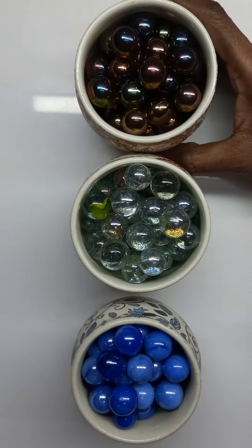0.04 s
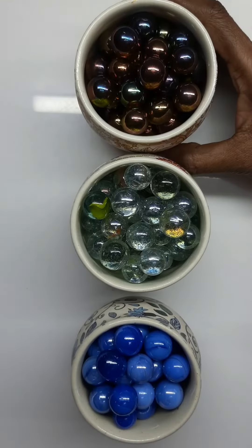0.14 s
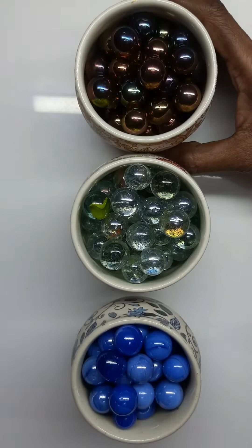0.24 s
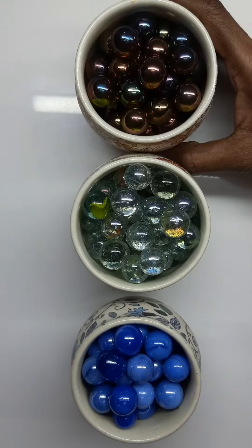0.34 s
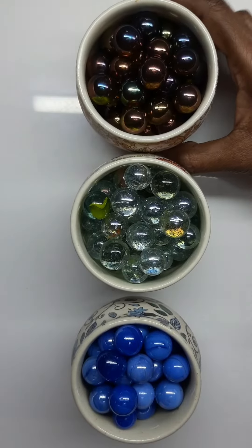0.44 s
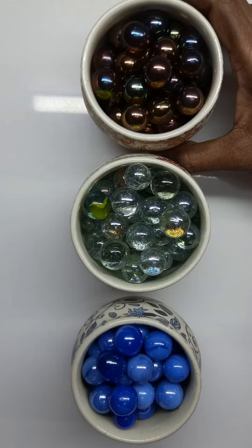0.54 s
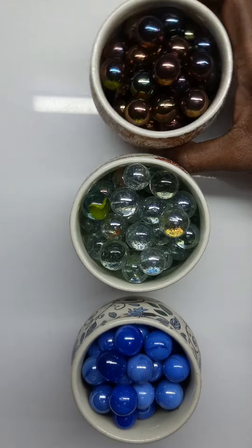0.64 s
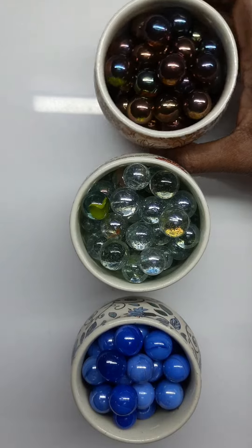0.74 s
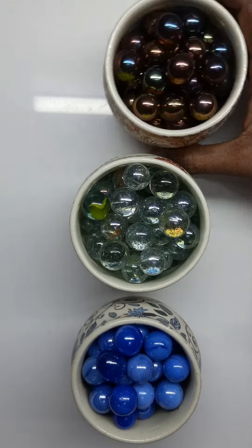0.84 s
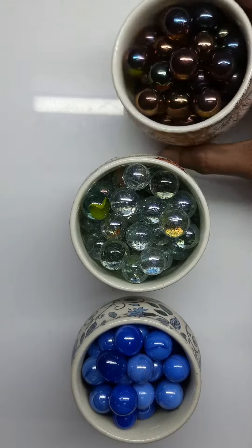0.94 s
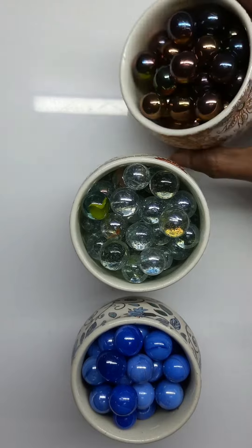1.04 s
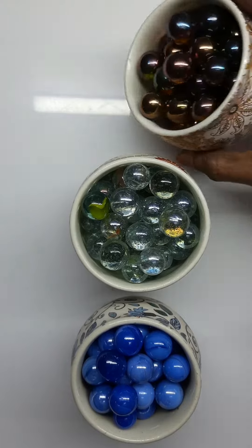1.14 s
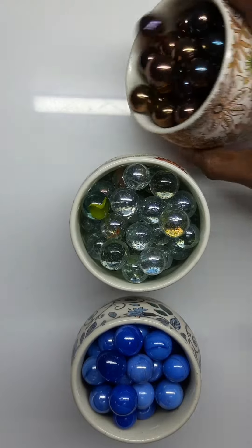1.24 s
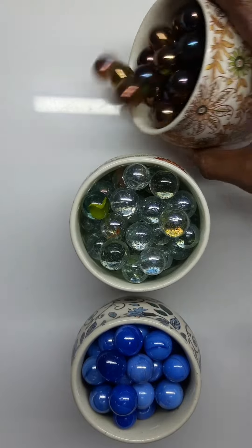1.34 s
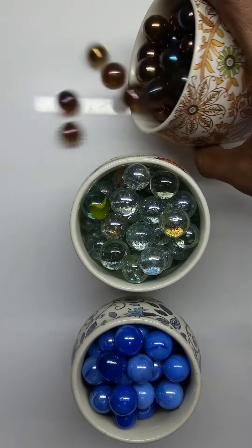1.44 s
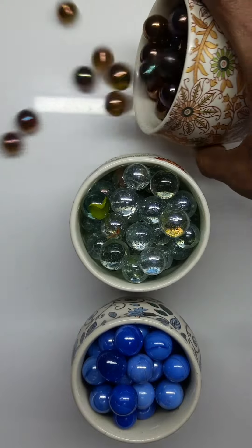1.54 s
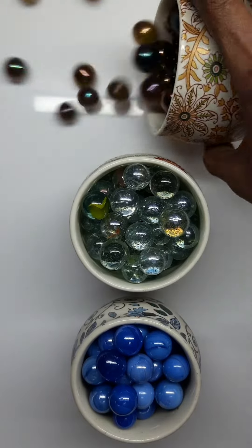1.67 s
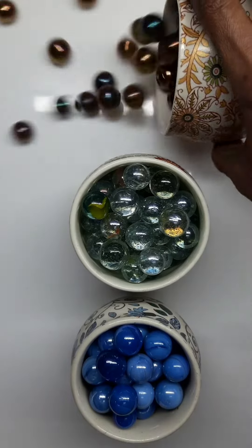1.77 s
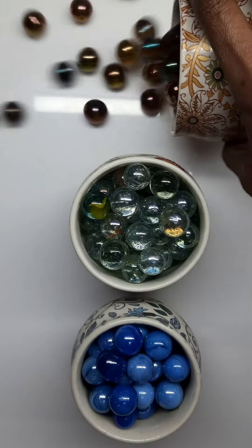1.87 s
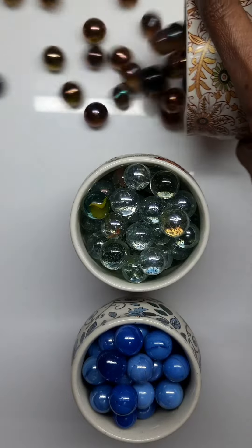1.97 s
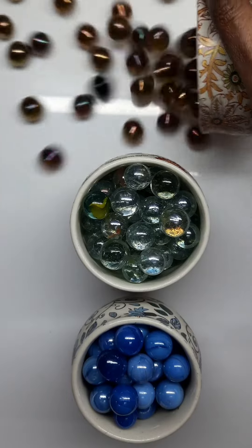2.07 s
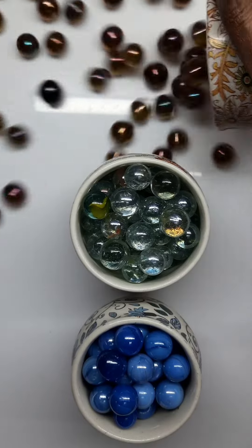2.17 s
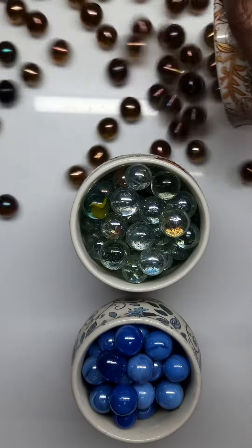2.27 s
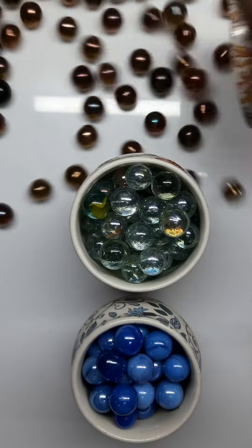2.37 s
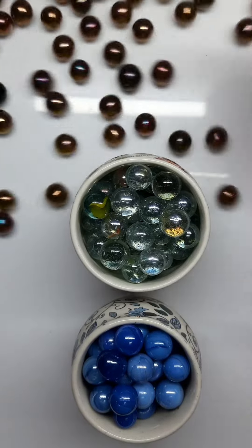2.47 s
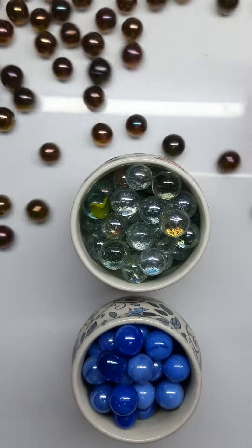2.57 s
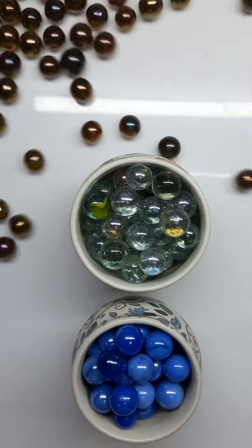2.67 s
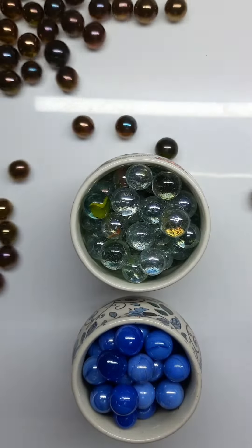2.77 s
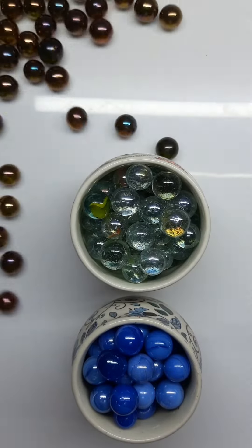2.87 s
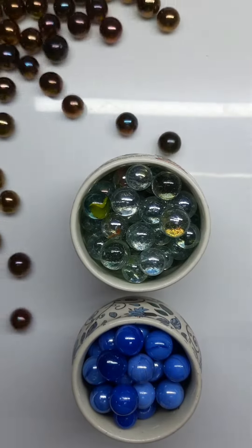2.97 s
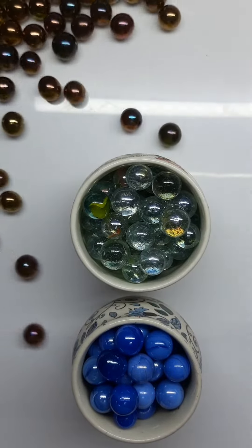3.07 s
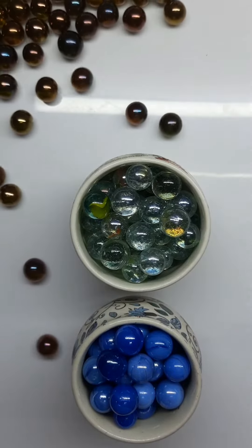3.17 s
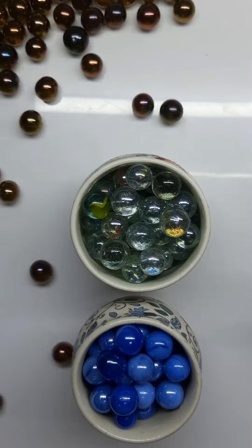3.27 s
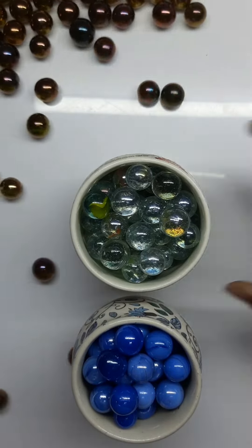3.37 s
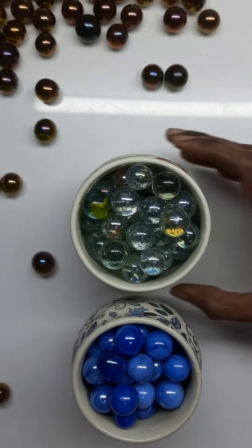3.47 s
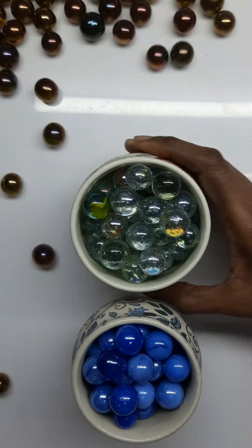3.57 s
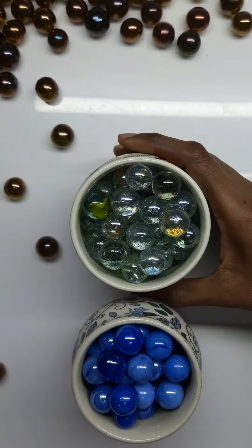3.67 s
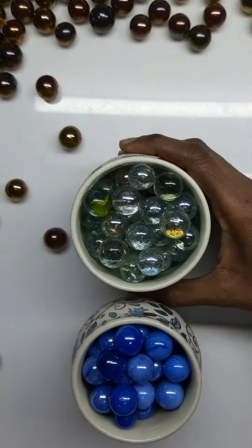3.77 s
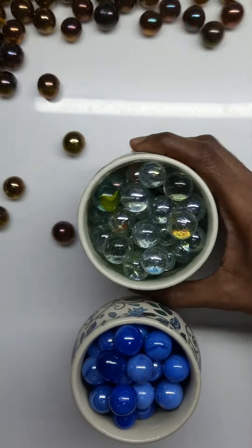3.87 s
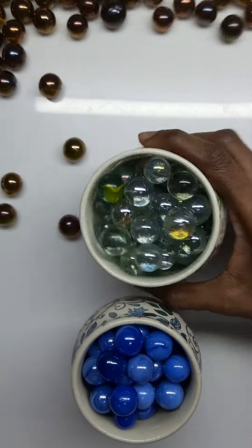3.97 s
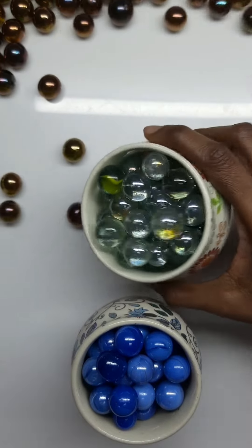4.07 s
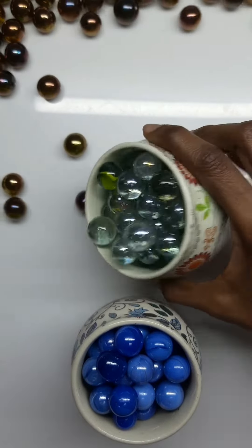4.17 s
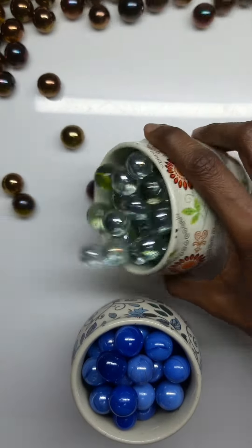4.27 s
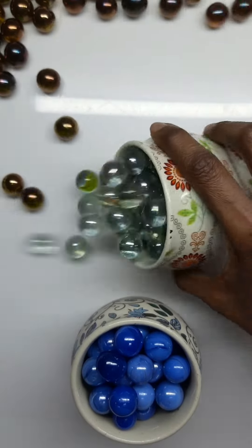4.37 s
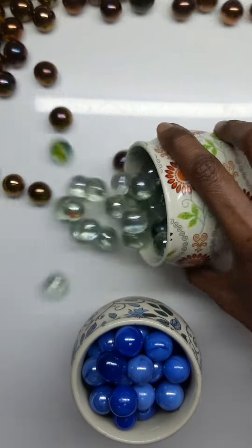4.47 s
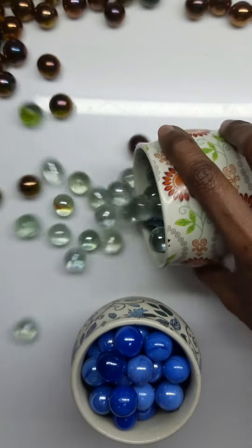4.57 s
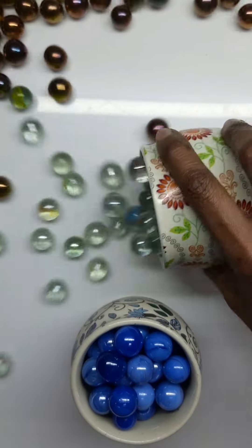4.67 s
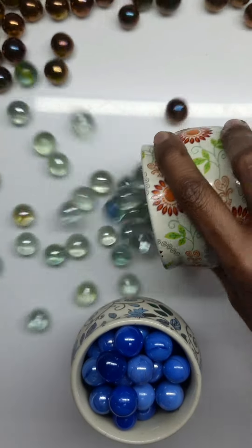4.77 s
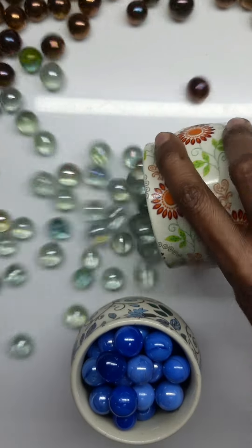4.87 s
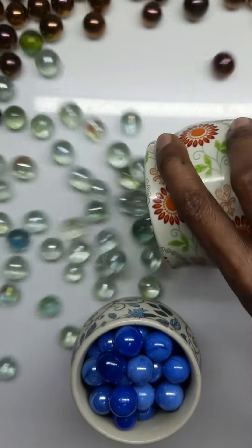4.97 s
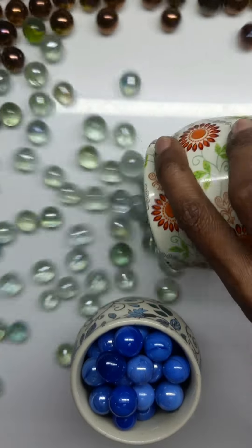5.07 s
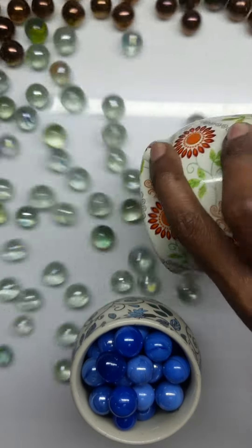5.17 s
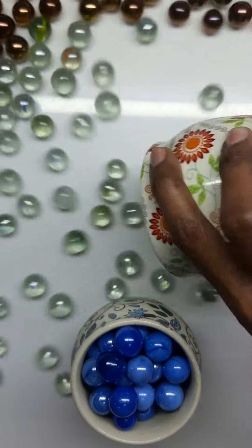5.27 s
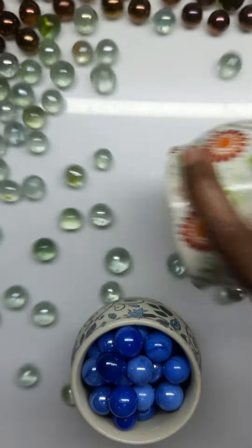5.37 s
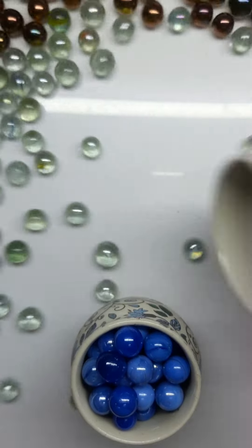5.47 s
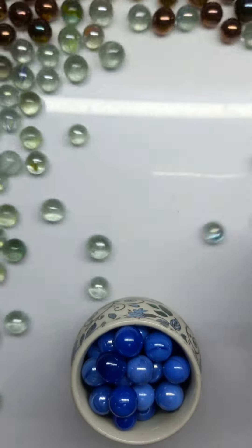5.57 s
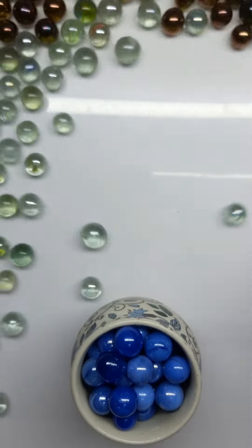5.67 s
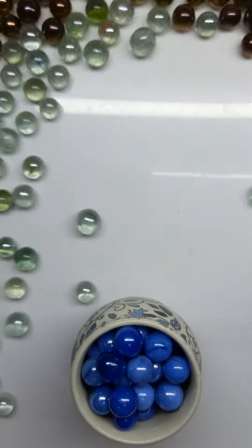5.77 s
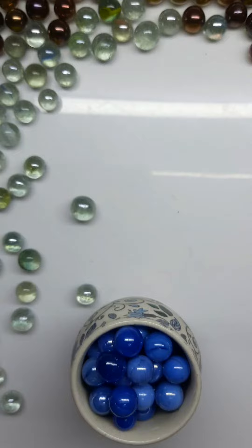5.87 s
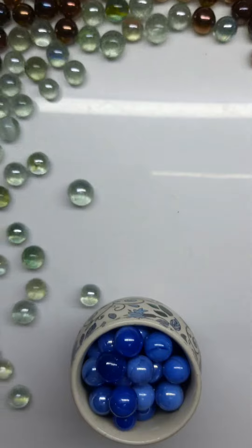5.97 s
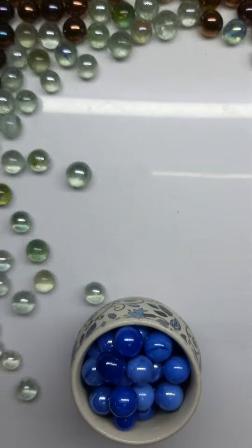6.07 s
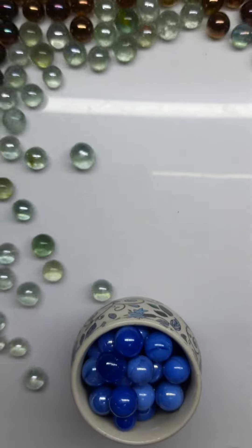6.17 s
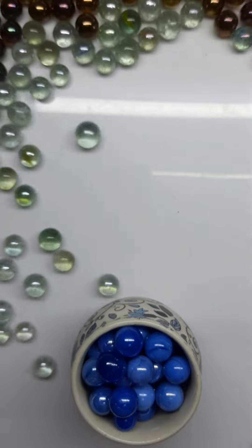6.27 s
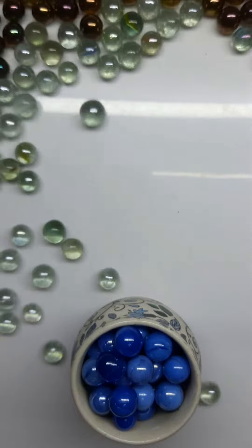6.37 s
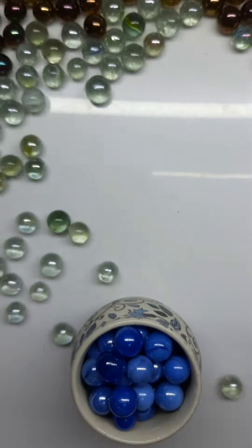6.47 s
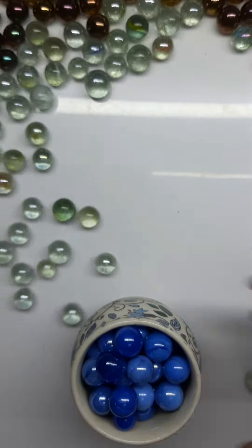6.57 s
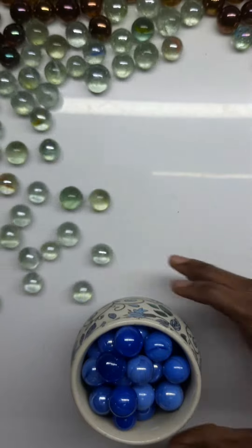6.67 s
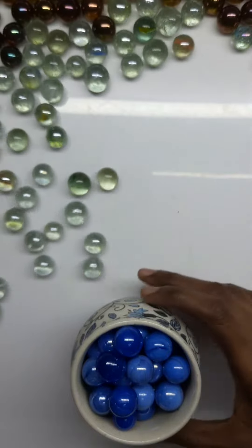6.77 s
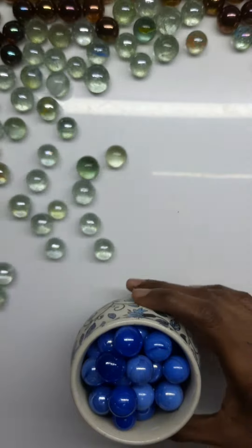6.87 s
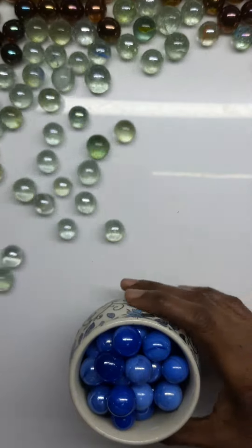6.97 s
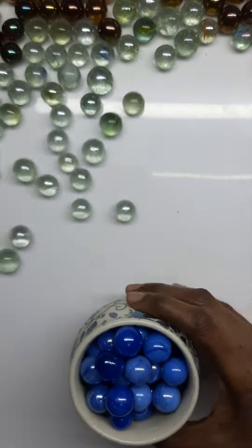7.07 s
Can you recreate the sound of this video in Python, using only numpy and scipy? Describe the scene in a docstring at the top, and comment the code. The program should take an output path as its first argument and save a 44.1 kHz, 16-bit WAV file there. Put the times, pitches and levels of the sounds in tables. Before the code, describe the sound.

Glass marbles clink out of a tipped ceramic cup, clatter and thump onto a hard board, roll and click, then a second cupful follows.

```python
"""A cup rubs over a hard board in a small room, over a low hum, a faint ringing and a fading hiss.
Glass marbles clink in the tipped cup (resonances), then thump and clatter on the board (random contacts
through board modes). They roll with a grainy whirr and drone, click together, and a few knock dully.
A second cup is tipped out the same way: clinks, thumps, clatter, whirr, clicks and dull knocks again."""
import sys
import numpy as np
from scipy import signal
from scipy.fft import rfft, irfft
from scipy.io import wavfile
from scipy.ndimage import uniform_filter1d

SR = 44100
rng = np.random.default_rng(int(sys.argv[2]) if len(sys.argv) > 2 else 0)


def bounce(signal):
    """Save signal as a 16-bit WAV file at the path given by the first command-line argument."""
    frames = np.transpose(np.atleast_2d(signal))
    limited = np.clip(frames, -1, 1)
    pcm = np.round(limited * 32767).astype(np.int16)
    wavfile.write(sys.argv[1], SR, pcm)


N = 313992
TIME = np.arange(N) / SR  # s


def amp(db):
    """Amplitude from dB."""
    return 10 ** (np.asarray(db) / 20)


def unit(x):
    """Scale to RMS 1."""
    return x / np.sqrt(np.mean(x ** 2) + 1e-20)


def read(points, hz):
    """Interpolate (frequency [Hz], value) rows over log frequency."""
    f, value = np.transpose(points)
    return np.interp(np.log(hz + 1), np.log(f), value)


def level(rows, column):
    """Gain over time from one dB column of a curve, fading out beyond its ends."""
    rows = np.array(rows)
    outside_s = abs(TIME - np.clip(TIME, rows[0, 0], rows[-1, 0]))
    return amp(np.interp(TIME, rows[:, 0], rows[:, column])) * np.exp(-outside_s / 0.041)


def held(start_s, end_s, fall_db_per_s, rise_s=0.0036):
    """Envelope that rises at start, holds until end and then dies away."""
    rise = np.clip((TIME - start_s) / rise_s, 0, 1)
    return rise * amp(-fall_db_per_s * np.maximum(TIME - end_s, 0))


def add(mix, s, sound):
    """Add a stereo sound to the mix at a time in seconds."""
    part = mix[:, max(round(s * SR), 0):][:, :sound.shape[1]]
    part += sound[:, :part.shape[1]]


def noise():
    """Stereo white noise."""
    return rng.standard_normal((2, N))


def colour(x, spectrum, modes=(), scale=1, size=16384):
    """Minimum-phase filter of energy 1: a smooth spectrum with resonances standing on it."""
    hz = np.fft.rfftfreq(size, 1 / SR)
    power = 1 + sum(amp(db) ** 2 / (1 + (2 * (hz - f * scale) / width) ** 2) for f, width, db in modes)
    log_gain = np.log(amp(read(spectrum, hz)) * np.sqrt(power))
    circle = np.concatenate([log_gain, log_gain[-2:0:-1]])
    # the Hilbert transform of the log gain is the phase
    taps = np.fft.ifft(np.exp(np.conj(signal.hilbert(circle)))).real[:size // 2]
    taps /= np.linalg.norm(taps)
    return signal.oaconvolve(x, taps[None], axes=1)[:, :N]


def contact(t60, direct=.5, tint_db=3, spread_db=3.5, size=2600):
    """One contact: a pulse, then dense echoes off board and cups; its place sets delay and balance."""
    t = np.arange(size) / SR
    echoes = rng.standard_normal((2, size)) * amp(-60 * np.maximum(t - .0015, 0) / t60)
    echoes /= np.linalg.norm(echoes, axis=1, keepdims=True)
    place = rng.uniform(-1, 1)
    lag = round(7 * place)  # samples
    echoes[[0, 1], [8 - lag, 8 + lag]] += direct
    tint = np.column_stack([np.geomspace(500, 16000, 11), tint_db * rng.standard_normal(11)])
    padded = size + 256
    tint_gain = unit(amp(read(tint, np.fft.rfftfreq(padded, 1 / SR))))
    echoes = irfft(rfft(echoes, padded) * tint_gain)[:, :size]
    balance = amp(spread_db * place * np.array([[1], [-1]]))
    return echoes * balance / np.hypot(1, direct)


def blows(rows, t60, direct, tint_db=2):
    """A contact for each row (time [s], level [dB])."""
    out = np.zeros((2, N))
    for s, db in rows:
        add(out, s, contact(t60, direct, tint_db) * amp(db))
    return out


def patter(per_s, scatter_db, t60, tint_db=3, direct=0.47, count=48):
    """Random contacts of unequal strength, levelled to a mean power near 1."""
    chance, strength, kind = rng.random(N), rng.standard_normal(N), rng.integers(0, count, N)
    train = (chance < per_s / SR) * amp(scatter_db * np.minimum(strength, 1.4))
    local_power = uniform_filter1d(train ** 2, size=5000)
    train /= np.sqrt(np.maximum(local_power, 1e-3 * np.mean(train ** 2)))
    shapes = [contact(t60, direct, tint_db) for _ in range(count)]
    out = np.zeros((2, N))
    for i in np.flatnonzero(train):
        add(out, i / SR, shapes[kind[i]] * train[i])
    return out


# decay of the room: (frequency [Hz], t60 [s])
ROOM_T60 = [(150, 0.49), (500, 0.31), (1400, 0.37), (4000, 0.51), (9000, 0.46), (16000, 0.068)]
# treble absorbed by the walls: (frequency [Hz], level [dB])
ROOM_TINT = [(200, -0.5), (3000, 0), (8000, -6), (16000, 0.5)]


def room(x, wet_db):
    """Add a diffuse tail that builds up fast; each band dies at its own speed."""
    hz, t, z = signal.stft(rng.standard_normal((2, SR)), SR, nperseg=256)
    decay_db = -60 * t / read(ROOM_T60, hz)[:, None]
    z *= amp(read(ROOM_TINT, hz)[:, None] + decay_db) * (1 - np.exp(-t / 0.00059))
    tail = signal.istft(z, SR, nperseg=256)[1]
    tail /= np.linalg.norm(tail[0])
    return x + amp(wet_db) * signal.fftconvolve(x, tail, axes=1)[:, :N]


# pushes of the first cup: (start [s], end [s], relative rumble [dB], relative scrape [dB])
PUSHES = [(-.25, 0.072, -80, -60.5), (.5, 1, -49.5, -59.5)]
PUSH_RISE_S, PUSH_FALL_DB_PER_S = 0.19, 46
GRIP_S, GRIP_END_S, GRIP_DB = .9, 1.02, -55.5  # the cup's foot rasps as it tips
# source spectra: (frequency [Hz], density [dB/Hz])
RUMBLE = [(20, -19), (50, -26), (85, 9), (140, -6.5), (300, -12), (1000, -70)]
SCRAPE = [(100, -12), (250, 2.5), (450, -7), (700, -3), (1200, -12), (2500, -27.5), (5000, -27)]
HISS = [(300, 0), (1500, 0), (3000, -6), (4500, -8.5), (7000, -3.5), (11000, -7), (16000, -19)]
# resonances of the sliding cup: (frequency [Hz], width [Hz], level over the bare scrape [dB])
SLIDE_MODES = [(243, 13, 8), (360, 35, 6.5), (559, 16, 14), (662, 9.8, 10), (787, 13, 13.5), (1360, 47, 7),
               (2250, 67, 14.5)]
# faint ringing at the outset: (frequency [Hz], width [Hz], level [dB])
RING_MODES = [(1900, 46, 20), (2720, 40, 32), (2810, 50, 43), (3340, 40, 38)]


def handling():
    """Noise and grains excite the rubbing cup, over room hum; ringing dies, hiss sinks to a floor."""
    rumble_gain, scrape_gain = np.zeros((2, N))
    for start_s, end_s, rumble_db, scrape_db in PUSHES:
        speed = held(start_s, end_s, PUSH_FALL_DB_PER_S, PUSH_RISE_S)
        rumble_gain += speed ** 2 * amp(rumble_db)
        scrape_gain += speed * amp(scrape_db)
    grains = patter(per_s=1100, scatter_db=3, t60=0.01, tint_db=4)
    rasp = grains * held(GRIP_S, GRIP_END_S, fall_db_per_s=250) * amp(GRIP_DB)
    hum_gain = amp(-61.5)
    rumble = colour(noise(), RUMBLE) * (rumble_gain * amp(-7.0) + hum_gain)
    scrape = colour(noise() * scrape_gain * amp(4.0) + rasp * amp(-3), SCRAPE, SLIDE_MODES)
    hiss_gain = amp(-76.5) + amp(-68 - 60 * TIME / 2.1)
    hiss = colour(rasp + noise() * hiss_gain, HISS)
    ring = colour(noise(), HISS, RING_MODES) * amp(-57.5 - 60 * TIME / 0.94)
    return rumble + scrape + hiss + ring


# one row a cup: (slip starts [s], first landing [s], bulk slides [s], cup empty [s], last landing [s],
# relative tumbling [dB], relative clatter [dB], board drone against whirr [dB])
POURS = [(1.22, 1.44, 1.68, 2.144, 2.379, -26, -16, -4), (4.3, 4.355, 4.65, 4.94, 5.178, -23.5, -16, -10)]
# clearest clinks inside a cup: (time [s], relative level [dB])
CLINKS = [(1.1375, -24), (1.1632, -19), (1.1736, -19), (1.1944, -15), (1.2042, -13.5), (1.232, -7),
          (1.2533, -8.5), (1.27, -6.5), (1.32, -6.5), (1.365, -8.5), (1.3805, -11), (1.3987, -11),
          (1.6065, -5.5), (1.6833, -6), (1.717, -8), (1.7623, -9), (4.171, -9), (4.1778, -13),
          (4.1918, -16.5), (4.2472, -7.5), (4.2673, -8), (4.3094, -6), (4.326, -6), (4.3365, -8),
          (4.345, -6.5), (4.3567, -8), (4.3895, -8), (4.4179, -6.5)]
# resonances of marbles in each cup: (frequency [Hz], width [Hz], level over the bare click [dB])
CUP_MODES = [
    [(1170, 24, 22.5), (2960, 380, 12), (4430, 100, 6.5), (7320, 140, 22.5), (7960, 120, 12.5),
     (12850, 170, 21.5), (14400, 120, 13), (15500, 100, 9)],
    [(1135, 67, 21), (2960, 220, 19), (4250, 180, 5.5), (7200, 57, 25), (7400, 280, 13), (12660, 210, 22.5),
     (14600, 140, 6), (15100, 100, 6)],
]
# spectra of clinking glass and of a dull knock: (frequency [Hz], density [dB/Hz])
GLASS = [(100, -29), (500, -11), (1200, -15.5), (2500, -5.5), (5000, -1.5), (9000, 0), (12000, -8),
         (16000, -10)]
KNOCK = [(40, -42), (100, -16.5), (180, -9), (300, -7), (450, -3.5), (560, -8.5), (680, -11), (1000, -14),
         (2500, -21), (8000, -87)]
SLIP_S, SLIP_RISE_S = 0.05, .012  # the top layer slips first
LULL_DB, EMPTYING_DB_PER_S = -3.5, 61  # quieter until the bulk follows, then the cup runs empty
CUP_DETUNE = 0.005  # share by which the resonances shift between marbles of different sizes


def cups():
    """Marbles tumble in two surges and excite the tilted cup's resonances; hard clinks thud faintly."""
    out = np.zeros((2, N))
    for (slip_s, _, bulk_s, empty_s, _, tumble_db, _, _), modes in zip(POURS, CUP_MODES):
        top = held(slip_s, slip_s + SLIP_S, EMPTYING_DB_PER_S, SLIP_RISE_S)
        lull = held(slip_s, empty_s, EMPTYING_DB_PER_S, SLIP_RISE_S) * amp(LULL_DB)
        bulk = held(bulk_s, empty_s, EMPTYING_DB_PER_S)
        motion = np.max([top, lull, bulk], axis=0)
        own = [row for row in CLINKS if slip_s - .5 < row[0] < empty_s]
        scales = (1, 1 + CUP_DETUNE, 1 - CUP_DETUNE)
        for place, scale in enumerate(scales):
            tumble = patter(per_s=65, scatter_db=2.5, t60=0.02, tint_db=3.5, count=16)
            clinks = blows(own[place::len(scales)], t60=.016, direct=.35, tint_db=1.3)
            strikes = tumble * motion * amp(tumble_db) + clinks * amp(18.0)
            out += colour(strikes, GLASS, modes, scale)
            out += colour(clinks, KNOCK) * amp(-11)
    return out


# the clatter builds until the cup is empty, wanes, and dies after the last landing
FIRST_DB, WANE_DB_PER_S, SETTLE_DB_PER_S = -11.5, 12, 97


def flow():
    """How strongly marbles are raining on the board."""
    out = np.zeros(N)
    for _, first_s, _, empty_s, last_s, _, clatter_db, _ in POURS:
        still_in_cup = np.clip((empty_s - TIME) / (empty_s - first_s), 0, 1)
        swell_db = FIRST_DB * still_in_cup - WANE_DB_PER_S * np.maximum(TIME - empty_s, 0)
        out += held(first_s, last_s, SETTLE_DB_PER_S) * amp(clatter_db + swell_db)
    return out


# heavy blows that flex the whole board: (time [s], relative level [dB])
THUMPS = [(1.392, -9), (1.46, 0.5), (1.962, -0.5), (2.002, -6), (2.228, 0), (4.368, -3), (4.422, -0.5),
          (4.517, 2), (4.574, -6), (4.72, 1), (4.992, 6)]
# hard landings that stand out of the clatter: (time [s], relative level [dB])
LANDINGS = [(1.41, -7.5), (1.459, -5.5), (1.524, -8), (1.551, -11.5), (1.617, -10.5), (1.673, -16),
            (1.724, -15.5), (1.777, -7.5), (1.837, -7.5), (1.918, -9), (2.121, -6.5), (2.359, -7.5),
            (2.427, -10), (4.368, -7.5), (4.416, -7), (4.458, -11), (4.49, -10), (4.519, -7.5), (4.575, -7),
            (4.62, -12.5), (4.649, -6.5), (4.706, -15), (4.743, -10), (5.234, -6)]
# spectrum of the flexing board: (frequency [Hz], density [dB/Hz])
THUMP = [(20, -29), (40, -14), (60, -3.5), (110, -1.5), (160, -1), (300, -48), (1000, -101)]
FLEX_DB = -8  # flex of an ordinary landing against its own strength


def thumps(sway_s=0.0028):
    """The board flexes under the landings: low pulses, heard left and then right."""
    flexes = list(THUMPS) + [(s, db + FLEX_DB) for s, db in LANDINGS]
    pushes = blows(flexes, t60=.022, direct=3, tint_db=0)
    lesser = patter(per_s=60, scatter_db=4, t60=.022, tint_db=1, direct=3)
    left, right = colour(pushes * amp(6.5) + lesser * flow() * amp(-23.5), THUMP)
    delayed_right = np.roll(right, round(sway_s * SR)) * amp(-2.5)
    return room(np.array([left, delayed_right]), wet_db=-20.0)


# spectra of a blow on the board and of glass ticking: (frequency [Hz], density [dB/Hz])
BLOW = [(40, -23), (120, -12.5), (200, -1), (450, 0), (620, -4), (950, -0.5), (1500, -2.5), (2200, -0.5),
        (3600, -5.5), (6000, -4.5), (9000, -10), (12000, -11), (16000, -17)]
TICKING = [(1000, -11), (3000, 5), (5000, -0.5), (8500, 4), (12000, -4.5), (16000, -7.5)]
# modes of the board: (frequency [Hz], width [Hz], level over the bare blow [dB])
BOARD_MODES = [(175.6, 4.9, 8.5), (239.2, 18, 8), (297.7, 7.7, 7), (377, 27, -2), (504, 19, 4.5),
               (826, 15, 6), (1028, 130, 8), (1120, 8.8, -21), (1252, 10, 9), (1306, 59, 6), (1880, 110, 4),
               (2360, 60, 2)]


def clatter():
    """Marbles land and bounce, each contact tinted, exciting board modes; they strike each other brightly."""
    rain = flow()
    bounces = patter(per_s=320, scatter_db=4.5, t60=.011, tint_db=2.5)
    landings = blows(LANDINGS, t60=.014, direct=.3, tint_db=2)
    clacks = patter(per_s=140, scatter_db=6, t60=.007, tint_db=5)
    board = colour(bounces * rain * amp(-0.5) + landings * amp(20), BLOW, BOARD_MODES)
    return board + colour(clacks, TICKING) * rain * amp(-9.5)


# rolling marbles, one curve after each pour: (time [s], relative whirr [dB], relative ticking [dB])
ROLLING = [
    [(2.45, -37.5, -40.5), (2.732, -40.5, -41), (2.898, -46, -50.5), (3.412, -55, -61.5),
     (3.69, -53.5, -54), (4.042, -43.5, -49), (4.232, -41, -44), (4.3, -40.5, -32)],
    [(5.3, -36.5, -36), (5.588, -41, -46), (6.064, -43.5, -46), (6.312, -44.5, -51), (6.516, -41.5, -58),
     (6.668, -39, -48), (6.932, -34.5, -46.5), (7.12, -32.5, -32.5)],
]
# spectra of rolling bumps and of the droning board: (frequency [Hz], density [dB/Hz])
WHIRR = [(200, -30.5), (400, -5), (620, -5.5), (1000, 0.5), (1400, -2.5), (1900, 1), (2700, -7),
         (4200, -19), (8000, -15.5), (12000, -24.5), (16000, -36)]
DRONE = [(50, -36), (90, 0), (140, -11.5), (230, 6), (400, -1), (700, -11.5), (1500, -90)]


def rolling():
    """Tiny bumps under rolling marbles whirr and keep the board droning; neighbours tick in passing."""
    whirr_gain, drone_gain, tick_gain = np.zeros((3, N))
    for curve, (*_, drone_db) in zip(ROLLING, POURS):
        roll = level(curve, column=1)
        whirr_gain += roll
        drone_gain += roll * amp(drone_db)
        tick_gain += level(curve, column=2)
    bumps = patter(per_s=600, scatter_db=5, t60=.012, tint_db=4)
    whirr = colour(bumps, WHIRR) * whirr_gain * amp(0.6)
    drone = colour(noise(), DRONE, BOARD_MODES) * drone_gain * amp(3.0)
    touches = patter(per_s=80, scatter_db=7, t60=.007, tint_db=4)
    ticks = colour(touches, TICKING) * tick_gain * amp(2.5)
    return room(whirr + drone, wet_db=-4.0) + room(ticks, wet_db=-3.5)


# rolling marbles colliding: (time [s], relative level [dB], centre of the click [Hz])
CLICKS = [(2.6792, -19, 3500), (2.7099, -18.5, 3250), (2.7651, -18.5, 2770), (2.9827, -31.5, 3230),
          (3.0055, -28.5, 2830), (3.127, -32, 9200), (3.1413, -26, 3550), (3.275, -23, 3130),
          (3.3053, -24.5, 2480), (3.467, -39, 2500), (3.477, -33.5, 10400), (3.636, -33.5, 9000),
          (3.706, -29, 3060), (3.8938, -31, 4440), (3.904, -26, 2400), (3.9702, -29.5, 10500),
          (3.9878, -29, 12000), (4.106, -26, 7700), (5.832, -19, 4070), (5.87, -20, 2820),
          (6.0997, -22, 3290), (6.5052, -22.5, 7360), (6.5368, -18.5, 3530), (6.581, -15.5, 2840),
          (6.959, -9.5, 4350), (6.999, -10, 2760)]
# spectrum of the board after a sideways collision: (frequency [Hz], density [dB/Hz])
JOLT = [(60, -52), (200, 6.5), (600, -7), (1000, -3), (1800, -1), (4000, -4), (8000, -13), (16000, -43)]
JOLT_DB, JOLT_DB_PER_OCTAVE, JOLT_HZ = 20, -8.5, 3030  # duller clicks pass more to the board


def collisions(size=4096, sharpness=1.47, top_hz=11000):
    """Glass meets glass: a short click in a broad band of its own, and a jolt of the board."""
    hz = np.fft.rfftfreq(size, 1 / SR) + 1
    glass, jolts = np.zeros((2, N)), np.zeros((2, N))
    for s, db, centre_hz in CLICKS:
        band = 1 / (1 + 1j * sharpness * (hz / centre_hz - centre_hz / hz))
        band /= 1 + 1j * hz / top_hz
        band /= np.sqrt(np.mean(abs(band) ** 2))
        touch = contact(t60=.012, direct=.2)
        add(glass, s, irfft(rfft(touch, size) * band) * amp(db + 18))
        board_db = JOLT_DB + JOLT_DB_PER_OCTAVE * np.log2(centre_hz / JOLT_HZ)
        add(jolts, s, contact(t60=0.063, direct=0.1) * amp(db + board_db))
    return glass + colour(jolts, JOLT, BOARD_MODES)


# dull knocks: (time [s], relative level [dB], rebound against the knock [dB])
KNOCKS = [(2.955, 1, -12), (3.063, -5.5, 0), (6.111, 3.5, -12), (6.250, 1, 0.5)]
# modes of a dull knock: (frequency [Hz], width [Hz], level [dB])
HOLLOW_MODES = [(233, 40, 14), (304, 48, 15.5), (481, 84, 8.5)]
REBOUND_S = .016


def knocks():
    """Stray marbles knock dully on low, hollow modes and rebound."""
    hits = []
    for s, db, rebound_db in KNOCKS:
        hits += [(s, db), (s + REBOUND_S, db + rebound_db)]
    taps = blows(hits, t60=.07, direct=1.8, tint_db=1)
    return room(colour(taps, KNOCK, HOLLOW_MODES) * amp(5), wet_db=-3.5)


# stereo width: (frequency [Hz], side gain [dB])
WIDTH = [(40, -4), (80, -9), (150, -39.5), (350, -8.5), (600, -5), (1100, -2), (2500, 0), (16000, 0)]


def close_pair(x):
    """Two close microphones: the side signal is cut by frequency, most around 150 Hz."""
    mid, side = (x[0] + x[1]) / 2, (x[0] - x[1]) / 2
    side = irfft(rfft(side) * amp(read(WIDTH, np.fft.rfftfreq(N, 1 / SR))), N)
    return np.array([mid + side, mid - side])


def scene():
    """All sources in the same small room; the thumps bypass the microphone pair."""
    in_air = handling() + room(cups(), wet_db=-6.5) + room(clatter(), wet_db=-5.5)
    in_air += rolling() + room(collisions(), wet_db=-8.5) + knocks()
    return close_pair(in_air) + thumps()


EDGE_HZ = 16100


def record(dry):
    """Round off the peaks, then limit the band."""
    lowpass = signal.firwin(401, EDGE_HZ, window=("kaiser", 8), fs=SR)
    return signal.oaconvolve(np.tanh(dry), lowpass[None], "same")


dry = scene()
out = record(dry)
bounce(out)
```